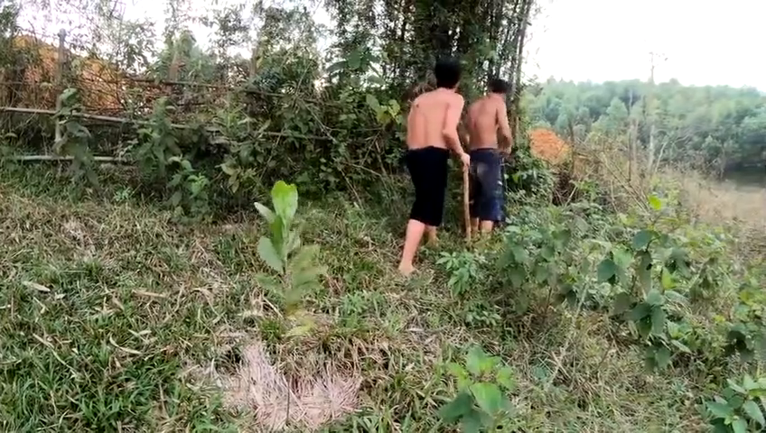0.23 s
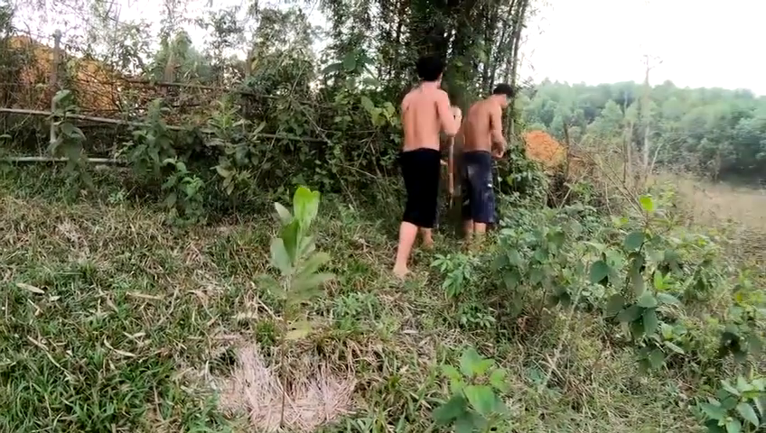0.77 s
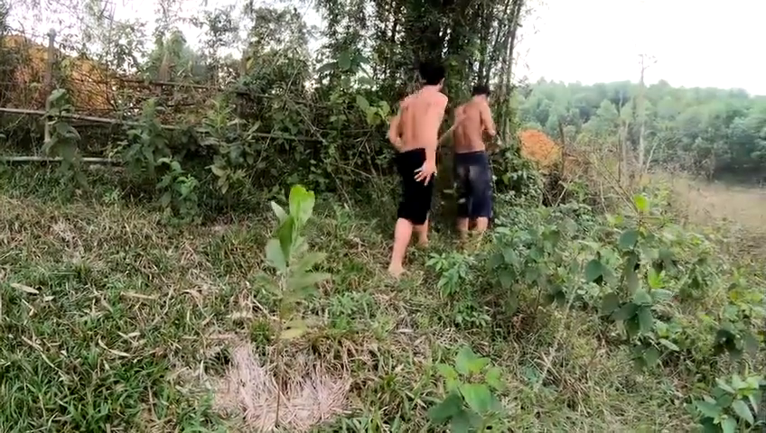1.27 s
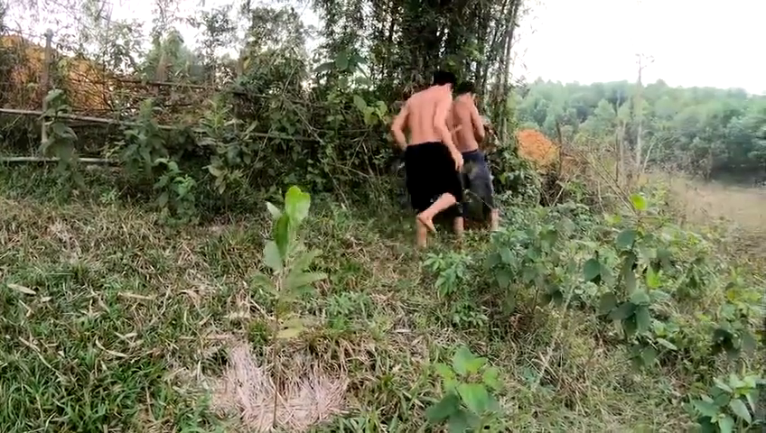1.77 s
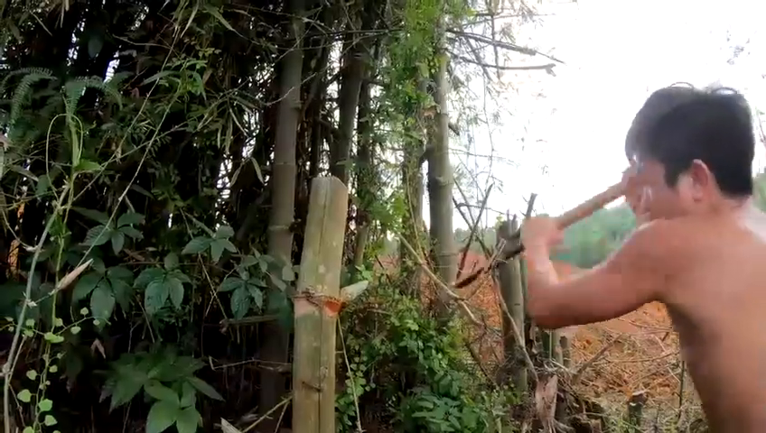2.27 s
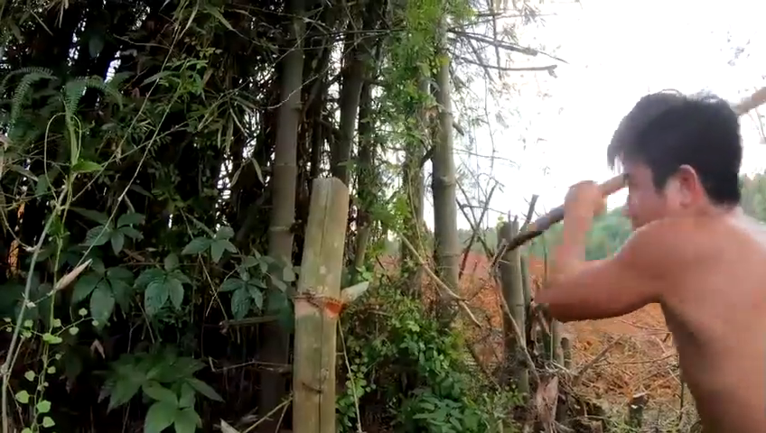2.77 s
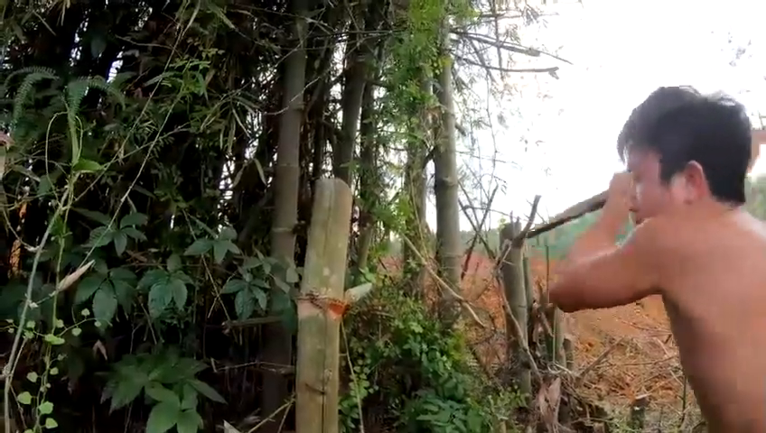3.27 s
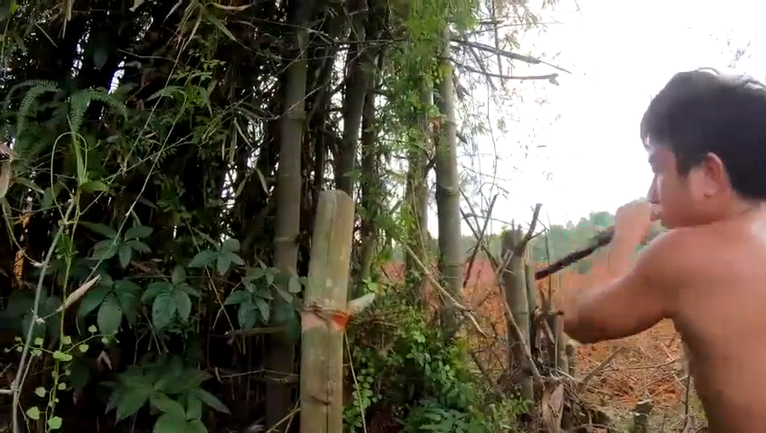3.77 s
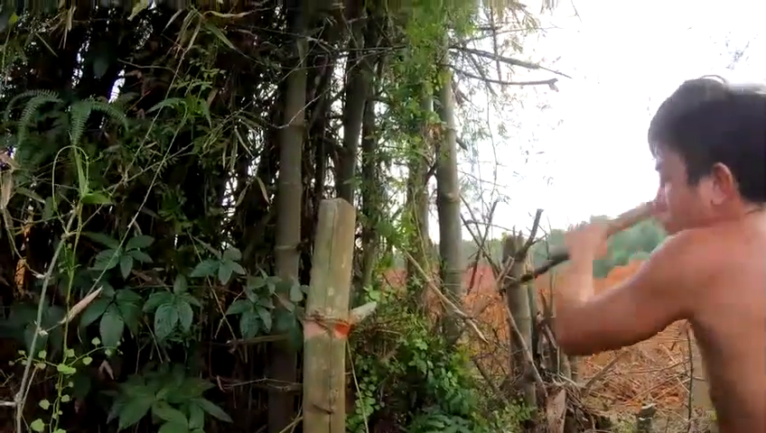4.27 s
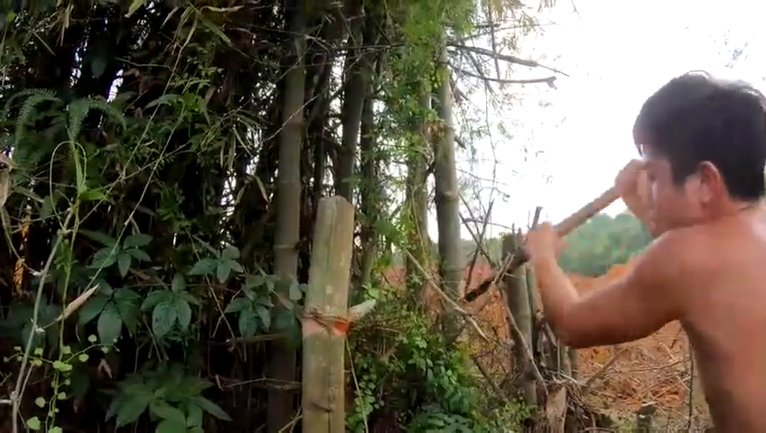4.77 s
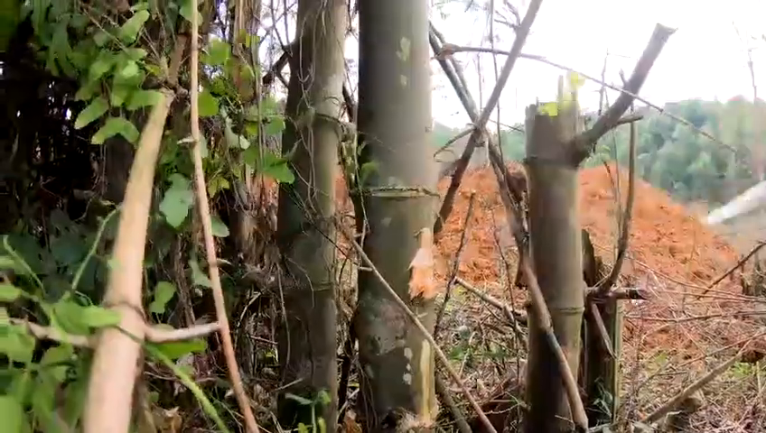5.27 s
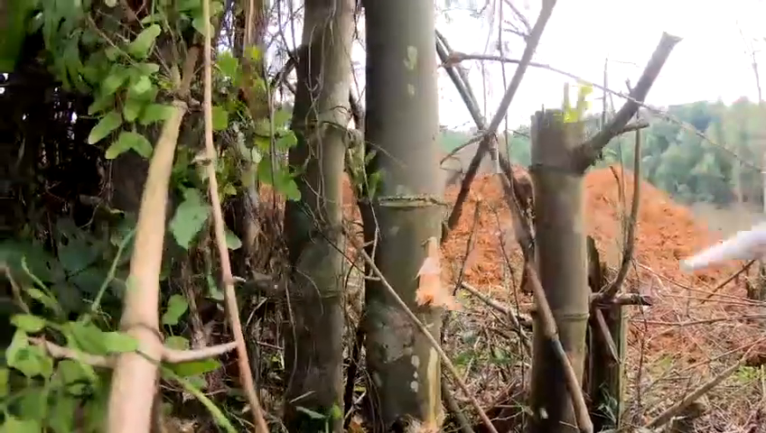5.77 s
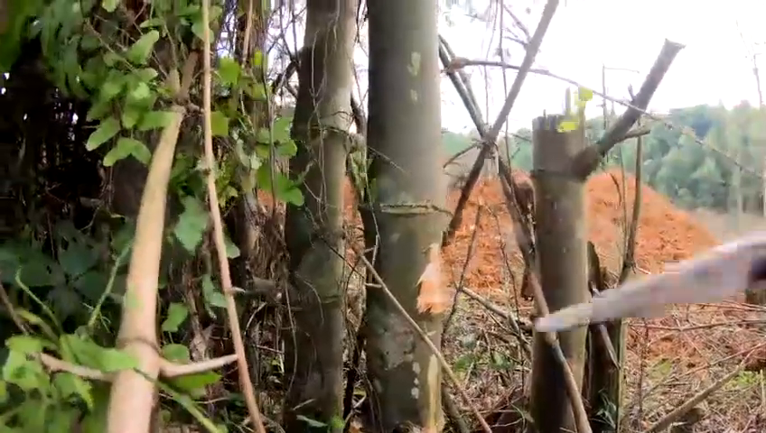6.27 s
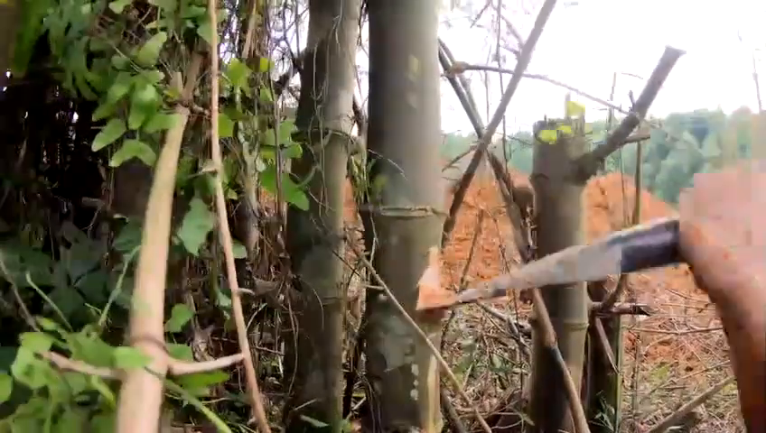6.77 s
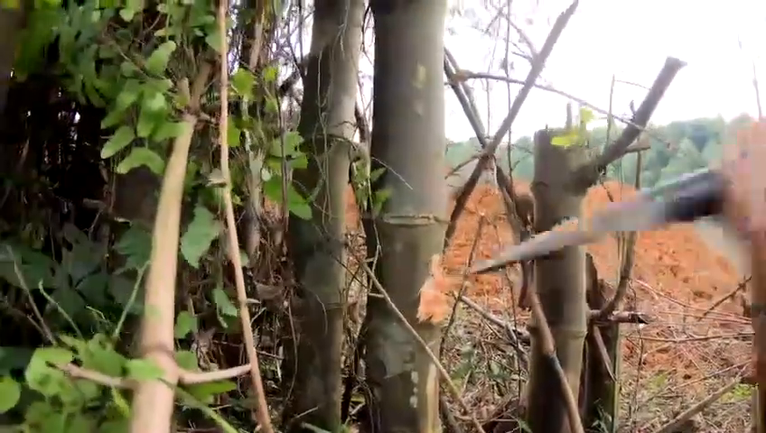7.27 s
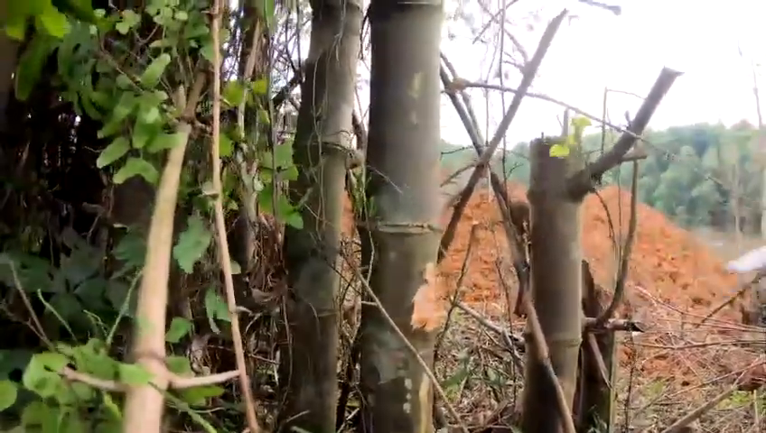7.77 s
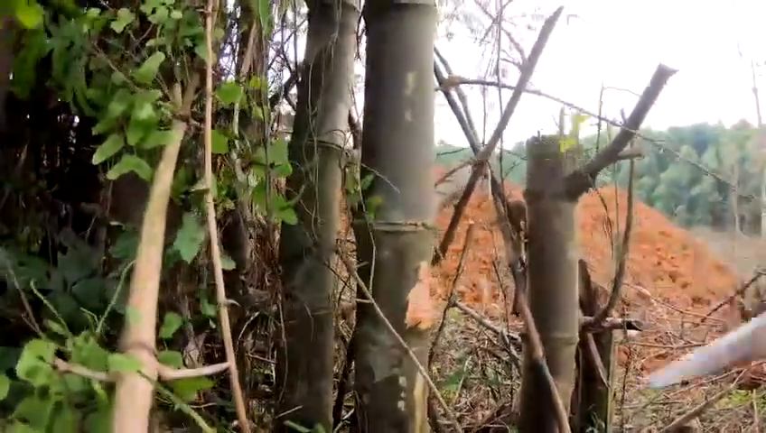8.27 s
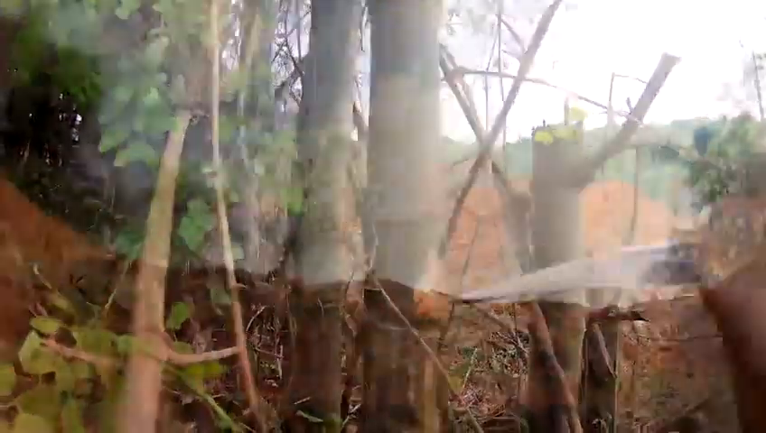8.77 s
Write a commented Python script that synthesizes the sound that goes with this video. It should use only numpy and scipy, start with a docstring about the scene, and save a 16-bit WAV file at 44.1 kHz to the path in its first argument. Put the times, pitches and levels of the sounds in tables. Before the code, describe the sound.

Two seconds of crunching footsteps in dry litter, with sharp twig snaps, open in a quiet field. A hard cut brings a close bamboo stem being jabbed by a steel chisel about four times a second: splintery crack, hollow knock, rattling pole, shaken leaves. Near five seconds the view cuts closer; thumps grow heavier and rattles softer. It ends abruptly in faint field hum. The microphone shifts between wide bright and dull mono.

```python
"""In a bamboo clump, feet crunch up through dry litter; then, from two closer viewpoints, a steel chisel on a
long pole jabs a stem again and again. Filtered noise makes hum, wind, crunches and the diffuse decay of twigs;
sums of damped modes make the hollow stem's thump and knock and the loose head's rattle as the pole is pulled back.
The sound is cut at each change of view, and the pickup drifts between dull mono and bright and wide."""
import sys
import numpy as np
from scipy import signal
from scipy.fft import rfft, irfft
from scipy.io import wavfile
from scipy.ndimage import uniform_filter1d

SR = 44100
rng = np.random.default_rng(int(sys.argv[2]) if len(sys.argv) > 2 else 0)


def transcribe(u):
    """Save the signal u as a 16-bit wav file named by the first command-line argument.

    u: samples, shape (n,) or (channels, n), limited to [-1, 1]; the rate is SR.
    q: integer samples, one column per channel.
    """
    v = np.clip(np.atleast_2d(u).T, -1, 1)
    q = np.round(v * 32767).astype(np.int16)
    wavfile.write(sys.argv[1], SR, q)


N = 397782


def amp(db):
    """Level law: 20 dB is a factor of ten in amplitude."""
    return 10 ** (np.asarray(db) / 20)


def unit(x):
    """Normalisation to an rms of 1."""
    return x / np.sqrt(np.mean(x ** 2) + 1e-20)


def read(points, hz):
    """Interpolation of a response along a logarithmic frequency axis."""
    f, value = np.transpose(points)
    return np.interp(np.log(hz + 1), np.log(f + 1), value)


def colour(points, hz):
    """Spectral shaping: gains with a mean power of 1."""
    return unit(amp(read(points, hz)))


def smooth(x, size, axis=-1):
    """Low-pass by a moving average applied twice."""
    return uniform_filter1d(uniform_filter1d(x, size=size, axis=axis), size=size, axis=axis)


# Starts of the walk, first stem, second stem and quiet field, then the end: [t/s]
VIEW_STARTS = [0, 1.9215, 4.984, 8.856, 9.03]


def view_of(s):
    """Segmentation of time: 0 walk, 1 first stem, 2 second stem, 3 quiet field."""
    return np.searchsorted(VIEW_STARTS, s, "right") - 1


def add(mix, s, sound):
    """Superposition of a sound from s; it breaks off where the view changes."""
    start, end = round(s * SR), round(VIEW_STARTS[view_of(s) + 1] * SR)
    part = mix[..., start:end][..., :sound.shape[-1]]
    part += sound[..., :part.shape[-1]]


def noise(shape_of, size, patchy_db):
    """Short-time synthesis: noise whose magnitude follows shape_of(Hz, s), with random patches."""
    hz = np.fft.rfftfreq(size, 1 / SR)[:, None]
    t = np.arange(4 * N // size + 5) * size / 4 / SR
    real, imaginary, patch = rng.standard_normal((len(t), len(hz), 3)).T
    # smooth the patches over 5 frequencies and 5 frames
    patch = uniform_filter1d(uniform_filter1d(patch, size=5, axis=0), size=5, axis=1)
    gain = shape_of(hz, t) * amp(patchy_db * unit(patch))
    z = (real + 1j * imaginary) * gain / np.sqrt(size)
    return signal.istft(z, nperseg=size, noverlap=3 * size // 4)[1][:N]


def crumbs(length, coarse_db, size):
    """Granular modulation: gain that jumps from grain to grain, rms 1; a few grains are large."""
    grains = np.minimum(rng.exponential(1, length // size + 1), 4)
    return unit(amp(coarse_db * grains).repeat(size)[:length])


def ring(modes, view, rise_s, detune, spread_db):
    """Modal superposition: damped sines, peak 1; each blow may vary their frequencies and levels."""
    hz, t60, db = np.array(modes)[:, [0, 1, view + 1]].T[..., None]
    t = np.arange(min(SR // 4, int(t60.max() * SR))) / SR
    level_chance, pitch_chance = rng.standard_normal((2, len(modes), 1))
    decay = amp(db + spread_db * level_chance - 60 * t / t60)
    sound = (decay * np.sin(2 * np.pi * hz * (1 + detune * pitch_chance) * t)).sum(0)
    sound *= 1 - np.exp(-t / rise_s)
    return sound / abs(sound).max()


def burst(points, t60, swell_s, swell_db, lumpy_db, coarse_db):
    """Impulsive fracture: splintered noise that dies fast, peak 1, after a thin hiss that swells for 20 ms."""
    t = np.arange(-882, 2205) / SR
    hz = np.fft.rfftfreq(len(t), 1 / SR)
    white, lumps = rng.standard_normal((2, len(t)))
    lumps = unit(smooth(lumps, 25))[:len(hz)]  # chance bands of the spectrum
    sound = irfft(rfft(white) * amp(read(points, hz) + lumpy_db * lumps), len(t))
    swell = signal.lfilter(*signal.butter(2, [2600, 6500], "band", fs=SR), sound)
    swell *= amp(swell_db) * np.exp(t / swell_s)
    attack = np.minimum(amp(swell_db) + abs(t) / 0.00093, 1)
    crack = sound * amp(-60 * t / t60) * attack * crumbs(len(t), coarse_db, size=30)
    sound = np.where(t < 0, swell, crack)
    return sound / abs(sound).max()


def choked(sound, s):
    """Damping window: holds, then dies away smoothly by s."""
    u = np.minimum(np.arange(len(sound)) / SR / s, 1)
    return sound * (1 - u ** 4) ** 2


# Spectrum of the far hum of the field: [f/Hz, relative level/dB]
HUM_SPECTRUM = [(100, -59), (195, -10.5), (245, 5.5), (310, -16), (400, -14), (750, -24), (1100, -16.5),
                (5000, -31), (7500, -34), (15000, -42.5)]
# Hum in each view: [level/dB]
HUM_DB = [-53.5, -49.5, -47, -55]
# Wind on the microphone: [t/s, mean level/dB]
WIND_LEVEL = [(0, -42.5), (.24, -64), (.7, -55), (1.05, -69), (1.581, -64), (1.66, -55), (1.8, -64),
              (4.8, -62.5), (5.099, -47), (8.999, -58)]


def field():
    """Stationary noise of the far hum, and low-frequency wind turbulence on the microphone."""
    def hum_shape(hz, t):
        return colour(HUM_SPECTRUM, hz) * amp(HUM_DB + HUM_DB[-1:])[view_of(t)]
    hum = noise(hum_shape, size=1024, patchy_db=2.2)
    gusts = amp(3.0 * unit(smooth(rng.standard_normal(N), 3000)))
    low_band = signal.butter(2, [24, 90], "band", fs=SR, output="sos")
    wind = unit(gusts * signal.sosfilt(low_band, rng.standard_normal(N)))
    s, db = np.transpose(WIND_LEVEL)
    return hum + wind * amp(np.interp(np.arange(N) / SR, s, db))


# Footsteps in dry litter: [t/s of full weight, level/dB, rise t/s, hold t/s, t60/s of settling]
FOOTSTEPS = [(0.364, -37.5, 0.027, 0.046, 0.91), (0.807, -30.5, 0.017, 0.023, 0.41),
             (1.298, -47, 0.0018, 0.016, .1), (1.348, -38.5, 0.017, 0.0033, 0.23),
             (1.8, -52.5, 0.36, 0.035, 0.71)]
# Spectrum of crunching litter: [f/Hz, relative level/dB]
LITTER_SPECTRUM = [(450, -9), (700, -23), (1050, -12.5), (2800, -2), (6000, -3), (8000, -27),
                   (11000, -16.5), (16000, -29)]
SETTLE, LIFT_T60 = .4, .08  # share of a crunch that settles slowly; the rest stops as the foot lifts (s)


def steps():
    """Granular crushing: litter swells, holds and stops under each foot, over a faint steady rustle."""
    def shape(hz, t):
        weight = amp(-54.5)  # rustle
        for s, db, rise, hold, t60 in FOOTSTEPS:
            after = np.maximum(t - s - hold, 0)
            before = np.maximum(s - t, 0)
            fade = SETTLE * amp(-60 * after / t60) + (1 - SETTLE) * amp(-60 * after / LIFT_T60)
            weight = weight + fade * amp(db - 15 * (before / rise) ** 2)
        return colour(LITTER_SPECTRUM, hz) * weight * (t < VIEW_STARTS[1])
    return noise(shape, size=256, patchy_db=3.0) * (.6 + .5 * crumbs(N, 5.0, size=20))


# Snapping twigs: [t/s, mean peak level of both sides/dB, left minus right level/dB]
TWIG_SNAPS = [(0.8, -30, 5), (0.813, -21, 1), (1.345, -17.5, -4.5), (1.572, -26.5, 3), (1.637, -33, -1)]


def snaps():
    """Brittle fracture: single dry twigs break left or right, placed by level difference."""
    out, t = np.zeros((2, N)), np.arange(600) / SR
    band = signal.butter(4, [2200, 13000], "band", fs=SR)
    for s, db, pan_db in TWIG_SNAPS:
        snap = signal.lfilter(*band, rng.standard_normal(len(t)) * amp(-60 * t / 0.016))
        sides_db = db + np.array([[pan_db / 2], [-pan_db / 2]])
        add(out, s, snap / abs(snap).max() * amp(sides_db))
    return out


# Spectrum of shaken twigs and leaves: [f/Hz, relative level/dB]
TWIG_SPECTRUM = [(45, -2), (200, -2.5), (750, -11.5), (1250, -10.5), (3060, -15.5), (5500, -18),
                 (6800, -26.5), (7500, -35.5), (11000, -32), (16000, -52)]
# Decay of the twigs: [f/Hz, t60/s]
TWIG_DECAY = [(200, 0.32), (1000, 0.58), (3000, 0.63), (10000, 1)]
# Twigs at the first and second stem: [initial level/dB]
TWIG_DB = [-23.5, -24.5]
EARLIER_JAB = 1.885  # before the first close view opens: only its wake is heard (s)


def twigs():
    """Diffuse decay: each jab shakes twigs and leaves and echoes in the clump; bass dies first."""
    def shape(hz, t):
        power = np.zeros((len(hz), len(t)))
        for s in [EARLIER_JAB] + [row[0] for row in JAB_BLOWS]:
            view, age = max(view_of(s), 1), t - s - .004
            on = (age > 0) & (age < 1) & (view_of(t) == view)
            start_db = TWIG_DB[view - 1] + 1.52 * rng.standard_normal()
            power[:, on] += amp(start_db - 60 * age[on] / read(TWIG_DECAY, hz)) ** 2
        return colour(TWIG_SPECTRUM, hz) * np.sqrt(power)
    return noise(shape, size=256, patchy_db=2.5) * crumbs(N, 1.2, size=120)


# The head rattles as the pole is pulled back: [t/s, level/dB]
PULL_RATTLES = [(2.018, -22), (2.267, -15), (2.522, -18), (2.789, -24.5), (3.055, -22), (3.325, -17),
                (3.587, -22.5), (3.8657, -15.5), (4.148, -18.5), (4.425, -19), (4.708, -18.5),
                (4.977, -17.5), (5.116, -24), (5.374, -23), (5.636, -25.5), (5.9, -24.5), (6.16, -22),
                (6.435, -23.5), (6.7, -22.5), (6.976, -23), (7.254, -21), (7.539, -21.5), (7.819, -23.5),
                (8.093, -28), (8.387, -24.5), (8.66, -27)]
# Further rattles with their own time and level, some at the turn of the pole,
# each in place of any timed knock within 20 ms: [t/s, level/dB]
FURTHER_RATTLES = [(2.089, -28.5), (2.217, -20), (2.322, -22.5), (2.588, -28), (2.811, -25.5),
                   (3.401, -19.5), (4.2224, -18.5), (4.26, -23.5), (4.5458, -18.5), (5.013, -19.5),
                   (5.082, -21), (5.1808, -24.5), (8.165, -27.5)]
HOP_S, REBOUND_S = .019, .0347  # after a jab
TURN_S, SLIDE_S = .0742, .113  # turn of the pole and slide home, after a pull
HOP_DB, REBOUND_DB = [-26.5, -50], [-16, -25.5]  # mean level in the first and second close view
TURN_DB, SLIDE_DB = [-21.5, -22], [-26.5, -30]


def rattle_times():
    """Delayed impacts of loose play: hop and rebound after a jab; pull, turn and slide; as (t/s, level/dB)."""
    rows = []
    for starts, after, db, scatter_s, scatter_db in [(JAB_BLOWS, HOP_S, HOP_DB, .001, 2.5),
                                                     (JAB_BLOWS, REBOUND_S, REBOUND_DB, .0008, 1.5),
                                                     (PULL_RATTLES, TURN_S, TURN_DB, .001, 1.2),
                                                     (PULL_RATTLES, SLIDE_S, SLIDE_DB, .002, 2.5)]:
        chances = rng.standard_normal((len(starts), 2))
        for (s, *_), (time_chance, level_chance) in zip(starts, chances):
            at = s + after + scatter_s * time_chance
            clear = min(abs(at - further) for further, _ in FURTHER_RATTLES) > .02
            if view_of(at) == view_of(s) and clear:
                rows.append((at, db[view_of(s) - 1] + scatter_db * level_chance))
    return rows + PULL_RATTLES + FURTHER_RATTLES


# Modes of steel head and pole: [f/Hz, t60/s, relative level/dB in the first close view, in the second]
HEAD_MODES = [(1165, .06, -28, -19), (1960, .03, -24, -13), (2500, .025, -26, -16), (4400, .01, -16, -7),
              (5300, .01, -14, -6), (3330, .022, -14, -14), (2950, .009, -10, -8), (3850, .009, -10, -6),
              (3450, .008, 0, 0)]


def rattles():
    """Modal impact: short modes of steel and pole, a quick second bounce and a dry puff of grit."""
    out = np.zeros(N)
    for s, db in rattle_times():
        view = view_of(s)
        add(out, s, amp(db) * ring(HEAD_MODES, view, .0012, .02, 1.5))
        bounce = amp(db - 7.0) * ring(HEAD_MODES, view, 0.0023, 0.035, 1.5)
        add(out, s + rng.uniform(0.00201, .005), bounce)
        grit = burst(CRACK_SPECTRUM, 0.036, 0.0017, 0.0, 4.1, 0.99)
        add(out, s - 882 / SR, amp(db + [-12, -3][view - 1]) * grit)
    return out


# Jabs: [t/s, knock level/dB, knock f/Hz, thump level/dB, crack level/dB]
JAB_BLOWS = [(2.123, -10, 1500, -11, -8), (2.382, -10, 1690, -12.5, -9.5), (2.654, -12.5, 1180, -11.5, -5),
             (2.921, -13.5, 990, -10.5, -6.5), (3.191, -10.5, 1700, -13, -7),
             (3.453, -10.5, 1080, -14.5, -7.5), (3.732, -9.5, 1460, -12, -7), (4.012, -24, 1620, -15, -4),
             (4.295, -18.5, 1030, -19, -5), (4.573, -18.5, 1030, -21.5, -3.5),
             (4.845, -9.5, 1196, -13.5, -8), (4.986, -18, 1075, -16.5, -17), (5.241, -17, 1160, -10, -5),
             (5.501, -9, 1105, -9, -4.5), (5.765, -8, 1040, -6.5, -5), (6.024, -13, 1090, -9, -3.5),
             (6.299, -10, 1070, -7.5, -4.5), (6.564, -9, 1120, -6, -4.5), (6.839, -11.5, 1360, -6.5, -4),
             (7.119, -10.5, 1170, -6, -5), (7.404, -7, 1140, -11.5, -6.5), (7.681, -9.5, 1086, -6.5, -2),
             (7.963, -8.5, 1455, -7.5, -5), (8.258, -8.5, 1510, -7, -2), (8.532, -12.5, 1135, -6.5, -4.5),
             (8.817, -8, 1570, -5.5, -4.5)]
# Spectrum of splintering fibres, also of grit: [f/Hz, relative level/dB]
CRACK_SPECTRUM = [(500, -17), (1500, 2), (2550, -1.5), (4000, 0.5), (5650, -0.5), (6900, -7), (7800, -17),
                  (11000, -16.5), (15500, -44)]
# Bending modes of the hollow stems: [f/Hz, t60/s, relative level/dB of the first stem, of the second]
BENDING_MODES = [(67.6, 0.14, -11, -8), (108.6, 0.089, 13, 5.5), (258.5, 0.18, -12, -8.5)]
# Wall modes of the stems: [f/Hz, t60/s, relative level/dB of the first stem, of the second]
WALL_MODES = [(487, 0.018, -6, -12), (924, 0.022, -11, -15.5)]
# Modes of the air in the stems: [f/Hz, t60/s, relative level/dB of the first stem, of the second]
AIR_MODES = [(207, 0.073, 4, 0.5), (330.3, 0.065, -11, -3.5)]
# One dull bump of the stem, without the edge: (t/s, level/dB)
DULL_BUMP = (7.037, -21)
BITE_S, BITE_DB = .0045, -8  # the edge bites twice more, within one and two of this time; softer by
KNOCK_T60 = 0.013  # ring of the wall at the notch (s)
THUMP_S, RETURN_S, RETURN_DB = 0.01366, 0.01537, -3  # choking time; return along the hollow
THUMP_LAG_S = [.0006, .0013]  # thump after the bite, first and second stem
BOOM_DB, SWELL_DB = [-27, -20], [-19, -7]  # boom; swelling hiss against the crack; first and second stem


def jabs():
    """Impact excitation: fibres splinter, the wall knocks as the edge bites, the hollow thumps and booms."""
    out = np.zeros(N)
    for s, knock_db, knock_hz, thump_db, crack_db in JAB_BLOWS:
        view, chance = view_of(s), rng.random(2)
        wall = WALL_MODES + [(knock_hz, KNOCK_T60, 0, 0)]
        for late, db in [(0, 0), (chance[0], BITE_DB), (1 + chance[1], BITE_DB)]:
            add(out, s + late * BITE_S, -amp(knock_db + db) * ring(wall, view, 0.0013, 0.053, 2.0))
        thump = -amp(thump_db) * ring(AIR_MODES, view, 0.003, 0.02, 1.2)
        add(out, s + THUMP_LAG_S[view - 1], choked(thump, THUMP_S))
        add(out, s + RETURN_S, amp(RETURN_DB) * choked(thump, THUMP_S / 2))
        boom = ring(BENDING_MODES, view, 0.0099, 0.041, 1.5)
        add(out, s + 0.00684, amp(BOOM_DB[view - 1]) * boom)
        crack = burst(CRACK_SPECTRUM, 0.032, 0.0076, SWELL_DB[view - 1], 3.4, 2.75)
        add(out, s - 882 / SR, amp(crack_db) * crack)
    bump_s, bump_db = DULL_BUMP
    add(out, bump_s, amp(bump_db) * ring(AIR_MODES + BENDING_MODES[:2], 2, 0.00049, 0, 0))
    return out


# Width of the pickup: [t/s, width from 0 mono to 1 wide]
WIDTH = [(0, 0.71), (1.92, 0.75), (1.922, 0.006), (3.65, 0), (4.3, 0.39), (4.98, 0.64), (4.99, 0.0039),
         (8.2, 0.0022), (8.85, 0.52), (8.86, 0.2)]
# Treble that the pickup adds at full width: [f/Hz, gain/dB]
WIDTH_LIFT = [(5500, -5.5), (8000, 13.5), (14000, 14)]
# Side channel against the middle at full width: [f/Hz, gain/dB]
WIDTH_SIDE = [(100, -14.5), (1500, 3.5), (4500, -4), (8000, 4), (14000, 6)]


def pickup(x):
    """Decorrelation: width lifts the treble and adds a side channel, the same sound with scattered phases."""
    hz, t, z = signal.stft(x, SR, nperseg=256)
    wide = np.clip(np.interp(t, *np.transpose(WIDTH)), 0, 1)
    mid = z * amp(wide * read(WIDTH_LIFT, hz)[:, None])
    scatter = np.exp(2j * np.pi * rng.random(z.shape)) - .2  # leans a little to the right
    side = mid * wide * amp(read(WIDTH_SIDE, hz))[:, None] * scatter
    return signal.istft(np.array([mid + side, mid - side]), SR, nperseg=256)[1][:, :N]


def scene():
    """Superposition of all sources; the snaps are already in stereo."""
    return pickup(field() + steps() + twigs() + rattles() + jabs()) + snaps()


def record(dry):
    """Soft saturation rounds off the loudest peaks; then a low-pass limits the band."""
    rounded = np.tanh(dry / 1.1) * 1.1
    low_pass = signal.firwin(511, 15900, window=("kaiser", 9), fs=SR)  # cutoff in Hz
    return signal.oaconvolve(rounded, low_pass[None], "same")


dry = scene()
out = record(dry)
transcribe(out)
```